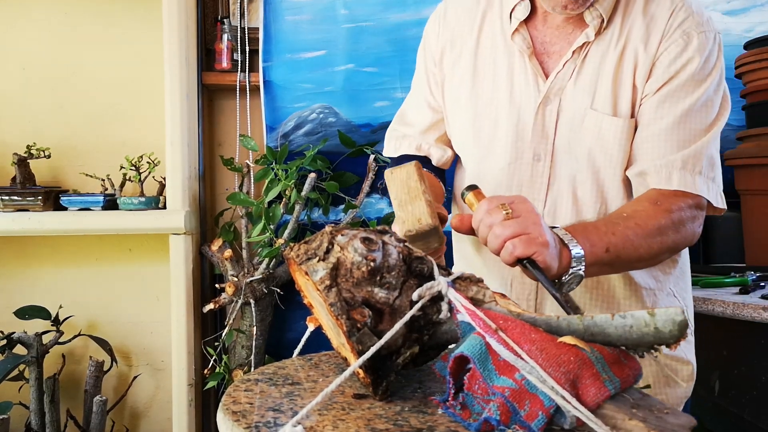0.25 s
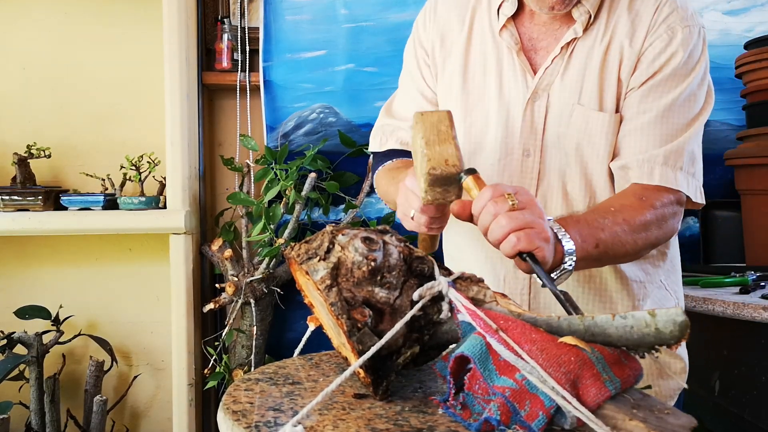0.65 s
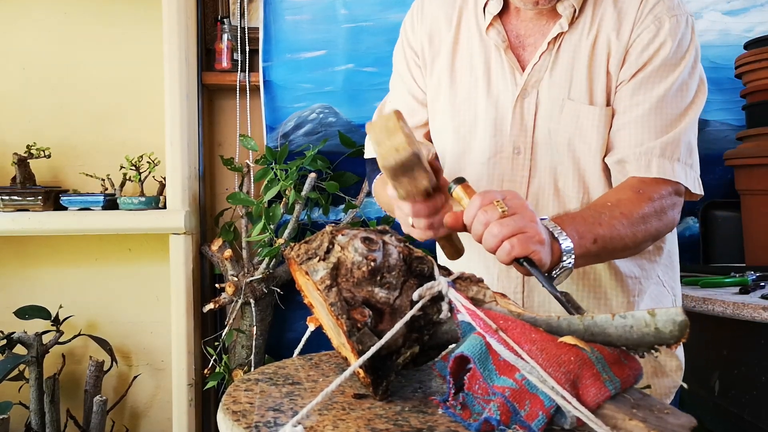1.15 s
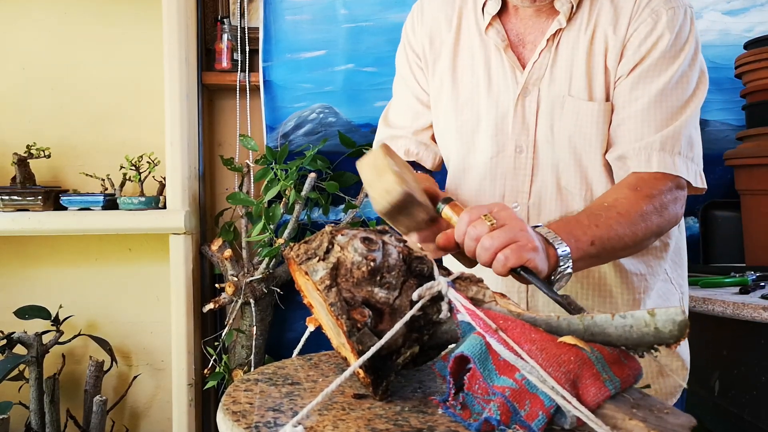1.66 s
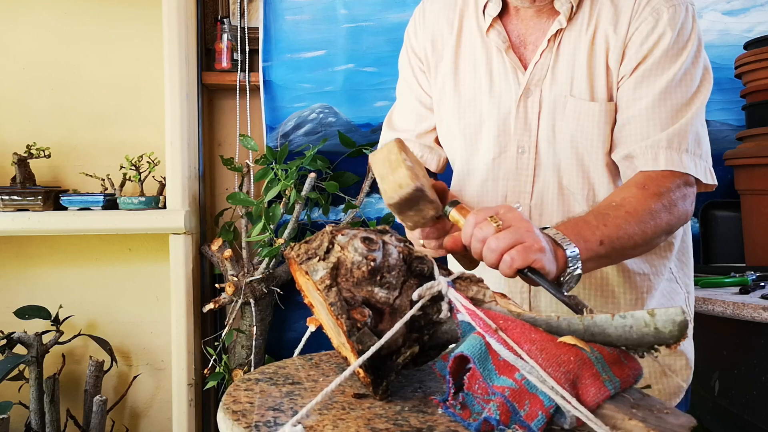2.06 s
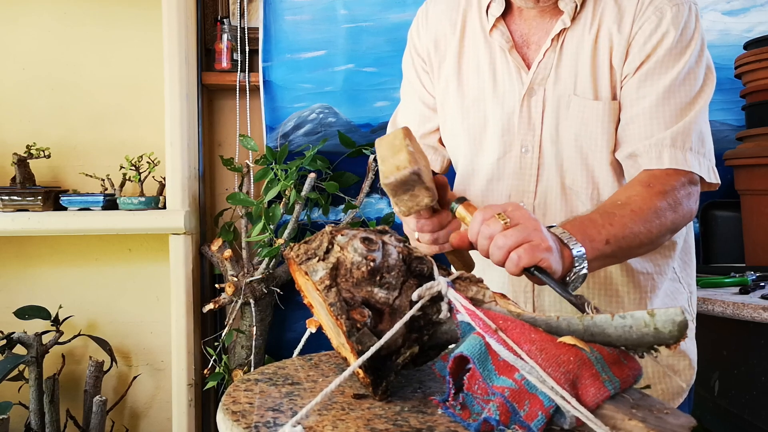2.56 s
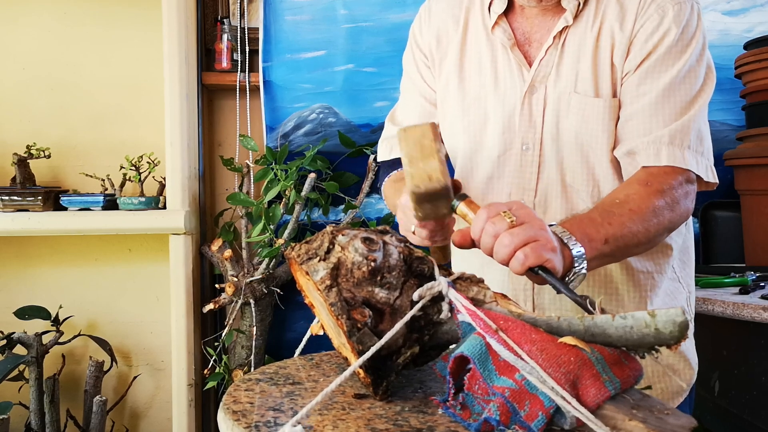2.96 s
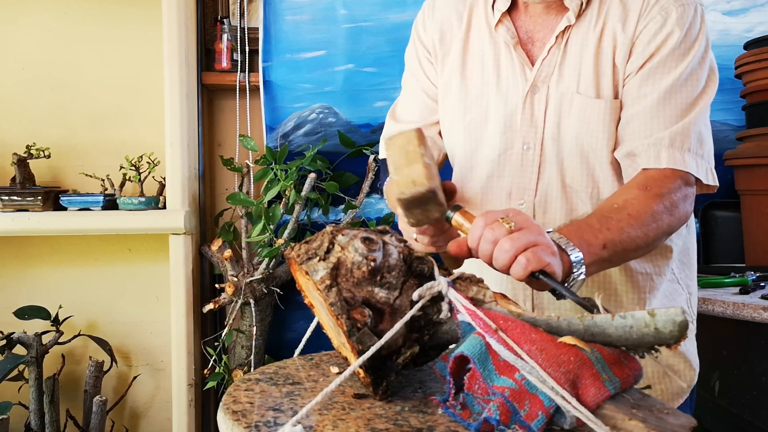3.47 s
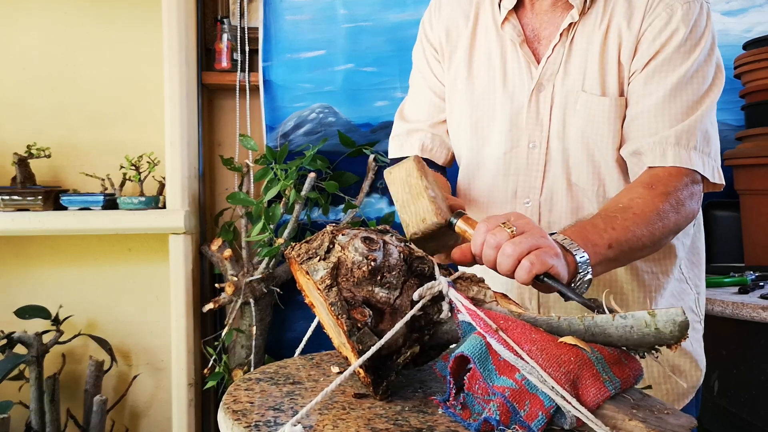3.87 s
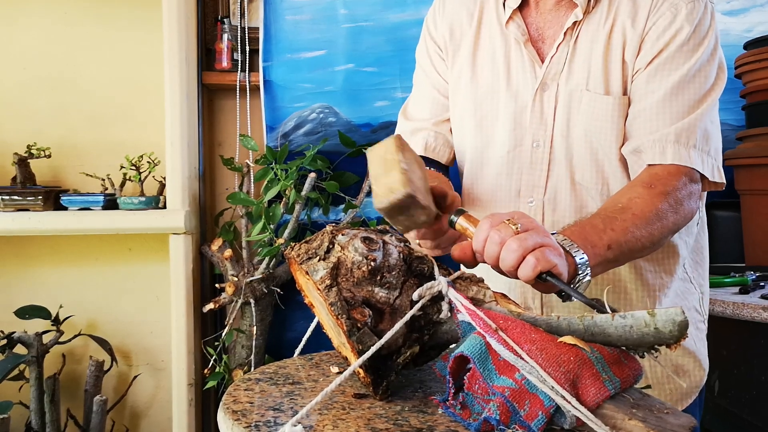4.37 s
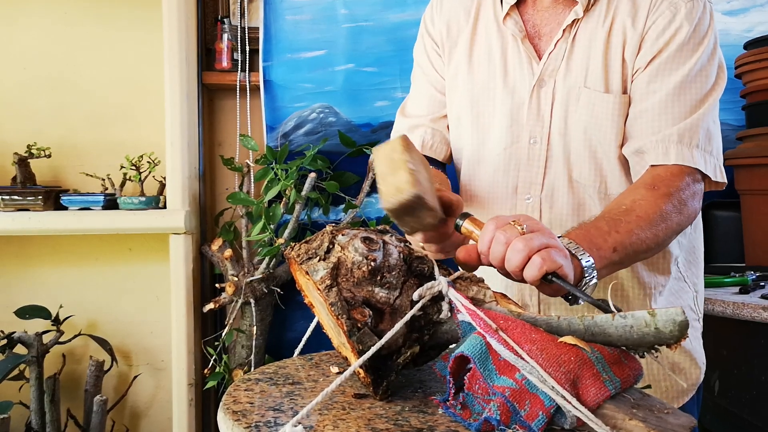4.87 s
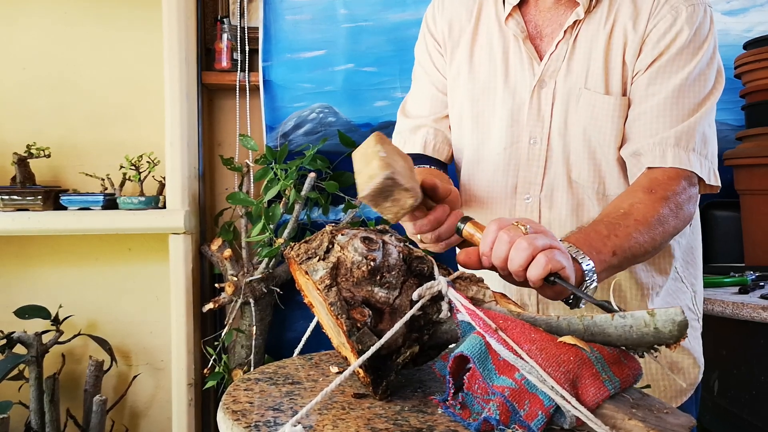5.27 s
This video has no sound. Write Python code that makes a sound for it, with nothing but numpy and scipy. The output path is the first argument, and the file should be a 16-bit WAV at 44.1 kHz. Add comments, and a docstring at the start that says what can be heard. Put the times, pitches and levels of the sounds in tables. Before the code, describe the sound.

For the first 0.7 seconds there is only a low, wavering engine drone from behind the walls, with soft rumble and very faint hiss. Then a wooden mallet begins tapping a gouge into dead wood, close and slightly right of centre. The first blows at about 0.7, 1.0 and 1.3 seconds are light, with an especially weak one at 1.5. From 2.0 seconds they become firm and even, a little over four a second, until the last at 5.4, with softer taps near 4.3 and 5.2. Each is a short, hard, mid-high woody knock with a tiny crack of splitting fibres, a faint ring from the stand and dense, quick reflections of a small hard room. The engine slows until about 1.9 seconds, picks up briefly near 2.4, then recedes. A low hum swells to 2.7, drops slightly in pitch, holds and fades after 4.2.

```python
"""Mallet and gouge on dead wood

In a small hard room a wooden mallet taps a gouge into a small trunk, about four blows a second, just right of centre.
Each blow briefly rings handle, mallet and trunk as damped modes and cracks the fibres as shaped noise bursts.
The work stand rings on as longer modes and dense noise reflections make the room.
Behind the walls an engine built of wavering orders slows and fades over filtered rumble and faint hiss,
while a low hum swells, settles to a lower pitch and fades."""
import sys
import numpy as np
from scipy import signal
from scipy.fft import rfft, irfft
from scipy.io import wavfile
from scipy.ndimage import uniform_filter1d

SR = 44100
rng = np.random.default_rng(int(sys.argv[2]) if len(sys.argv) > 2 else 0)


def file_out(sig):
    """Save sig as 16-bit WAV at sys.argv[1]."""
    # one column per channel
    cols = np.atleast_2d(sig).T
    # limit, then scale
    lim = np.clip(cols, -1, 1)
    pcm = np.round(lim * 32767).astype(np.int16)
    wavfile.write(sys.argv[1], SR, pcm)


N = 243096
TIME = np.arange(N) / SR
# puts a signal into the two ports with opposite signs
LEFT_RIGHT = np.array([[1], [-1]])


def carving(blow_db=1.0, wet_db=0.57, stand_db=-6, swell_s=0.018):
    """All the blows, each with the stand's ring and the room; moving arms change a share of the reflections."""
    # mallet blows: (time [s], strength [dB], handle pitch [Hz], mallet ring [dB], crack [dB]);
    # ring and crack are relative to the strength
    blows = [(.6976, 0.5, 1886, -5, -18.5), (.982, .5, 1967, -4, -12), (1.2651, -1.5, 1980, -6.5, -12.5),
             (1.514, -6.5, 2190, -5, -9), (1.754, -1, 2010, -9.5, -12.5), (1.9993, 6.5, 1964, -18, -11.5),
             (2.2279, 5, 2083, -31, -10.5), (2.4667, 6, 2036, -10.5, -11.5), (2.705, 7, 2013, -5.5, -9.5),
             (2.9653, 7.5, 2040, -6, -7.5), (3.1929, 7.5, 1947, -13.5, -7.5), (3.4309, 6.5, 2050, -5.5, -5),
             (3.6502, 6.5, 1943, -1, -11), (3.887, 5.5, 2080, -2, -12), (4.1113, 5, 2065, -7.5, -15),
             (4.3174, 0, 2070, -7.5, -17), (4.537, 5, 2080, -2.5, -13.5), (4.755, 5, 2130, 0.5, -13),
             (4.9756, 6.5, 2044, -3, -7), (5.2, 2, 2000, 8.5, -1), (5.4263, 6.5, 2070, 2.5, -11.5)]
    # modes of the work stand and shelves: (frequency [Hz], relative level [dB], t60 [s])
    stand_modes = [(337.4, -14.5, 0.17), (398, -14, 0.3), (415.5, -15.5, 0.33), (488, -15, 0.19),
                   (949, -20, 0.49), (1020, -14, 0.44), (1078, -14, 0.55), (1284, -13.5, 0.29),
                   (1620, -13, 0.37), (1722, -8.5, 0.36), (1840, -15, 0.57), (2220, -14, 0.34),
                   (2400, -12, 0.5), (2940, -5.5, 0.14)]
    # direct sound at strength 0 dB [dB] and its change per dB: light taps arrive more by way of the room
    direct_db, direct_db_per_db = -2, 0.32
    # light taps move the stand more, relative to their strength
    stand_share_db_per_db = -0.13
    changed = 0.3  # share of the reflections' energy that is new at each blow

    t = TIME[:SR // 3]
    out = np.zeros((2, N + len(t)))
    walls = room(t)
    # the stand takes up the blow gradually, and each port hears its modes in another phase
    stand_ring = np.array([ring(stand_modes, 1, t, phase=0.61) for _ in range(2)])
    stand = undb(stand_db) * (1 - np.exp(-t / swell_s)) * stand_ring
    for blow in blows:
        s, strength, *_ = blow
        direct = knock(blow, t)
        response = np.sqrt(1 - changed) * walls + np.sqrt(changed) * room(t)
        echo = signal.fftconvolve(direct[None], response, axes=1)[:, :len(t)]
        near = undb(direct_db + direct_db_per_db * strength) * direct
        ringing = undb(stand_share_db_per_db * strength) * stand
        start = int(s * SR)
        out[:, start:start + len(t)] += undb(strength + blow_db) * (near + ringing + undb(wet_db) * echo)
    return out[:, :N]


def knock(blow, t, handle_db=-3, mallet_db=-3.3, crack_db=1.6, cut_hz=440, bite_s=0.00025):
    """One blow rings handle, trunk and mallet; strength sets contact time, trunk share and crack colour."""
    # modes of each part: (multiple of its pitch, relative level [dB], t60 [s])
    handle_modes = [(1, 7, 0.019), (1.09, -10, 0.021), (.9, -36, 0.053)]
    trunk_modes = [(1.008, 6.5, 0.0075), (1.176, 6.5, 0.0057), (0.792, -6.5, 0.011), (0.623, -7, 0.012),
                   (0.425, -8, 0.006)]
    mallet_modes = [(1, 7.3, 0.014), (1.1, 4.3, 0.02)]
    # the trunk's note and fullness follow the spot where the gouge sits:
    # (time [s], pitch [Hz], level at strength 0 dB [dB])
    trunk_spot = [(.7, 1450, -3), (1, 1270, -2.3), (2.4, 1170, -2), (2.9, 1495, -0.2), (4.4, 1420, 1.4)]
    # light taps move mostly the trunk, hard ones ring the tools
    trunk_share_db_per_db = -0.8533
    # aim scatters the pitches of trunk and mallet by this share
    mallet_base_hz, aim_scatter = 2664, 0.027
    # time that wood on wood takes to compress at strength 0 dB, and its change:
    # hard blows press a little longer
    contact_s, contact_db_per_db = 0.0003, 0.14
    # tilt of the crack [dB per octave], and its change per dB of strength and of mallet ring:
    # hard blows tear duller, square ones brighter
    tilt_db, tilt_per_db, tilt_per_ring_db = 3.5, -0.62, 0.0675

    s, strength, handle_hz, mallet_ring, split = blow
    times, pitches, levels = np.transpose(trunk_spot)
    trunk_db = np.interp(s, times, levels) + trunk_share_db_per_db * strength
    base_hz = np.array([np.interp(s, times, pitches), mallet_base_hz])
    trunk_hz, mallet_hz = base_hz * (1 + aim_scatter * rng.standard_normal(2))
    contact = 1 - np.exp(-t / (contact_s * undb(contact_db_per_db * strength)))
    # neighbouring parts swing in opposite senses; the gnarled trunk answers in scattered phases
    body = undb(handle_db) * unit(contact * ring(handle_modes, handle_hz, t))
    body -= undb(trunk_db) * unit(contact * ring(trunk_modes, trunk_hz, t, phase=0.37))
    body -= undb(mallet_ring + mallet_db) * unit(contact * ring(mallet_modes, mallet_hz, t))
    tilt = tilt_db + tilt_per_db * strength + tilt_per_ring_db * mallet_ring
    bite = late(splinter(crack(t, tilt)), bite_s)  # the edge gives way once the force has built
    sound = body + undb(split + crack_db) * bite
    # small parts radiate no bass
    return signal.sosfilt(signal.butter(2, cut_hz, "highpass", fs=SR, output="sos"), sound)


def ring(modes, pitch, t, phase=0):
    """Damped modes set going by one push, with phases scattered by a share of a turn; unit energy."""
    total = np.zeros(len(t))
    for multiple, db, t60 in modes:
        swing = np.sin(2 * np.pi * (multiple * pitch * t + phase * rng.random()))
        total += undb(db) * swing * np.exp(-np.log(1000) * t / t60)
    return unit(total)


def crack(t, tilt_db, tear_s=0.00064):
    """The edge snaps through many fibres within a few milliseconds: a short noise burst."""
    # splitting fibres and the steel edge, ahead of the tilt: (frequency [Hz], relative level [dB per Hz])
    crack_spectrum = [(300, -28), (1500, -2), (2700, 2), (3500, 4.5), (4300, 0), (5600, -8.5), (7200, -9.5),
                      (9300, -18.5), (11000, -26), (15000, -50)]
    envelope = np.exp(-t / tear_s) * (1 - np.exp(-(t + 1 / SR) / tear_s))
    fibres = rng.standard_normal(len(t)) * envelope
    return unit(causal(fibres, crack_spectrum, tilt_db))


def splinter(bite, count=3):
    """The main crack, then a few smaller snaps at random moments."""
    # mean wait [s], level against the crack [dB] and spread of that level [dB]
    wait_s, snap_db, spread_db = 0.0054, -18.5, 4.5
    waits = wait_s * rng.exponential(size=count)
    sizes = undb(snap_db + spread_db * rng.standard_normal(count))
    return unit(bite + sum(size * late(bite, wait) for wait, size in zip(waits, sizes)))


def room(t, build_s=0.00017, likeness=0.022):
    """Stereo response of dense reflections that build at once and last longest in the low end."""
    # room decay: (frequency [Hz], t60 [s])
    room_t60 = [(300, 0.43), (1000, 0.29), (2500, 0.28), (5000, 0.31), (9000, 0.27), (15000, 0.28)]
    # colour of the reflections against the direct sound: (frequency [Hz], level [dB])
    room_tone = [(150, 13), (400, 6.5), (1000, 7.5), (2000, 3), (3000, 1.5), (5000, -0.5), (9000, 6.5),
                 (15000, 6.5)]
    hz = np.fft.rfftfreq(len(t), 1 / SR)
    mid, side = rfft(rng.standard_normal((2, len(t))))
    noise = (np.sqrt(1 + likeness) * mid + np.sqrt(1 - likeness) * side * LEFT_RIGHT) / np.sqrt(2)
    noise *= undb(at_hz(room_tone, hz))
    build = 1 - np.exp(-(t / build_s) ** 2)
    centres, decays = np.transpose(room_t60)
    response = np.zeros((2, len(t)))
    # overlapping bands, each with its own decay
    for decay, pick in zip(decays, np.eye(len(centres))):
        band = irfft(noise * np.interp(hz, centres, pick), len(t))
        response += unit(build * np.exp(-np.log(1000) * t / decay)) * band
    return response


def ports(x):
    """Each microphone port takes half of the level and phase difference."""
    # the two ports differ: (frequency [Hz], left minus right level [dB])
    port_levels = [(200, 0), (600, -1), (1300, .5), (2000, -2), (2900, -4), (4400, 2), (7000, .5),
                   (9500, -2.5), (14000, -3.5)]
    # the blows come from just right of centre: (frequency [Hz], lag of the left port [radians])
    port_lags = [(200, .05), (1000, .35), (2000, .6), (4000, .8), (8000, .85), (14000, .4)]
    hz = np.fft.rfftfreq(N, 1 / SR)
    half = LEFT_RIGHT / 2
    gain = undb(half * at_hz(port_levels, hz))
    turn = np.exp(-1j * half * at_hz(port_lags, hz))
    return irfft(rfft(x) * gain * turn, N)


def motors():
    """What comes through from behind the walls: engine, hum and rumble."""
    return engine() + hum() + rumble()


def engine():
    """Orders of the cycle rate, which slows evenly and then holds at idle; low and high ones fade apart."""
    # engine orders: (multiple of the cycle rate, relative level [dB])
    low_orders = [(3, -12), (4, 1), (5, -1.5), (6, 0), (7, -10)]
    high_orders = [(8, 9), (9, 6.5), (10, -0.5), (11, -14.5), (12, -7.5), (13, -14), (14, -18.5), (16, -23)]
    # the low orders swell a little, sink, pick up again at 2.4 s and recede: (time [s], level [dB])
    low_level = [(0, -27), (.5, -24.5), (1.2, -27), (2.05, -33), (2.4, -25.5), (3.1, -37), (4.9, -37),
                 (5.5, -41)]
    # the high orders drop away as the engine recedes: (time [s], level [dB])
    high_level = [(0, -32.5), (2.1, -34.5), (3.2, -44.5), (5.5, -50.5)]
    start_hz, idle_hz, idle_s = 19.7, 17.05, 1.9
    turns = np.cumsum(np.interp(TIME, [0, idle_s], [start_hz, idle_hz])) / SR
    low = undb(curve(low_level)) * orders(low_orders, turns)
    high = undb(curve(high_level)) * orders(high_orders, turns)
    return low + high


def orders(table, turns, waver_db=3.0, wander=0.91):
    """Multiples of a shaft rate, each wavering in level and phase on its way through the walls."""
    total = np.zeros(N)
    for multiple, db in table:
        phase = 2 * np.pi * (multiple * turns + rng.random()) + wander * walk(8)
        total += undb(db + waver_db * walk(12)) * np.sin(phase)
    return level(total, 0)


def hum(throb_db=1.87, wander=0.51):
    """A single low tone swells, holds and fades, throbbing a little in level and phase."""
    hold_db, full_s, release_s = -32.5, 2.7, 4.2
    rise_db_per_s, fall_db_per_s = 2, 7
    # on reaching full level it settles to a lower pitch
    first_hz, settled_hz, settle_s = 96.85, 92.2, 0.288
    rise = rise_db_per_s * np.maximum(full_s - TIME, 0)
    fall = fall_db_per_s * np.maximum(TIME - release_s, 0)
    gain = undb(hold_db - rise - fall + throb_db * walk(16))
    hz = np.interp(TIME, [full_s, full_s + settle_s], [first_hz, settled_hz])
    phase = 2 * np.pi * np.cumsum(hz) / SR + wander * walk(12)
    return gain * np.sqrt(2) * np.sin(phase)


def rumble(side_db=-14):
    """Low noise that dies away evenly, nearly alike in both ports."""
    # rumble: (frequency [Hz], relative level [dB per Hz])
    rumble_spectrum = [(12, -9.5), (24, 4.5), (38, -4.5), (55, 1.5), (90, -3), (130, -3), (175, 1),
                       (220, -9), (300, -19.5), (400, -36.5), (700, -78)]
    mid, side = level(colour(rng.standard_normal((2, N)), rumble_spectrum), 0)
    side = level(np.gradient(side), side_db)  # the ports differ more as the waves get shorter
    return fading(start_db=-30.5, db_per_s=-2.38) * (mid + side * LEFT_RIGHT)


def air():
    """Faint hiss that slowly sinks, partly alike in both ports."""
    # hiss: (frequency [Hz], relative level [dB per Hz])
    air_spectrum = [(100, -42), (400, 0), (900, 2.5), (1700, 6.5), (3000, -2), (4500, -8), (7200, -12),
                    (10000, -21), (15000, -45.5)]
    left, right, shared = colour(rng.standard_normal((3, N)), air_spectrum)
    return level(np.array([left + shared, right + shared]), 0) * fading(start_db=-54, db_per_s=-0.99)


def undb(db):
    """Decibels to gain."""
    return 10 ** (np.asarray(db) / 20)


def curve(table):
    """A time table read at every sample."""
    s, value = np.transpose(table)
    return np.interp(TIME, s, value)


def at_hz(table, hz):
    """Read a table on a log-frequency axis."""
    f, value = np.transpose(table)
    return np.interp(np.log(np.maximum(hz, 1)), np.log(f), value)


def colour(x, table):
    """Filter by a spectrum."""
    return irfft(rfft(x) * undb(at_hz(table, np.fft.rfftfreq(N, 1 / SR))), N)


def causal(x, table, tilt_db):
    """Give a burst a smooth tilted spectrum with nothing ahead of its onset (minimum phase)."""
    size = len(x)
    hz = np.clip(np.fft.rfftfreq(size, 1 / SR), table[0][0], table[-1][0])
    spectrum = rfft(x)
    gain = undb(at_hz(table, hz) + tilt_db * np.log2(hz)) / np.abs(spectrum)
    # doubling the first half of the cepstrum and dropping the rest gives the phase
    cepstrum = irfft(np.log(gain), size)
    return irfft(spectrum * np.exp(rfft(2 * cepstrum[:size // 2], size)), size)


def level(x, db):
    """Set the rms level."""
    return x * undb(db) / np.sqrt(np.mean(x ** 2))


def unit(x):
    """Scale to unit energy."""
    return x / np.sqrt(np.sum(x ** 2))


def walk(rate):
    """Slow random drift with a spread near 1, from `rate` fresh values per second."""
    k = int(SR / rate)
    steps = np.repeat(rng.standard_normal(N // k + 1), k)
    return np.sqrt(2) * uniform_filter1d(uniform_filter1d(steps, k), k)[:N]


def fading(start_db, db_per_s):
    """Gain that changes by a steady number of dB per second."""
    return undb(start_db + db_per_s * TIME)


def late(x, s):
    """Delay a sound by s seconds."""
    return np.concatenate([np.zeros(int(s * SR)), x])[:len(x)]


def scene():
    """The carving over motors and air."""
    return ports(carving()) + motors() + air()


def record(dry, top_hz=15200):
    """The recorder stops at full scale and cuts the top."""
    top_cut = signal.ellip(8, .2, 70, top_hz, fs=SR, output="sos")
    return signal.sosfilt(top_cut, np.clip(dry, -1, 1))


dry = scene()
out = record(dry)
file_out(out)
```